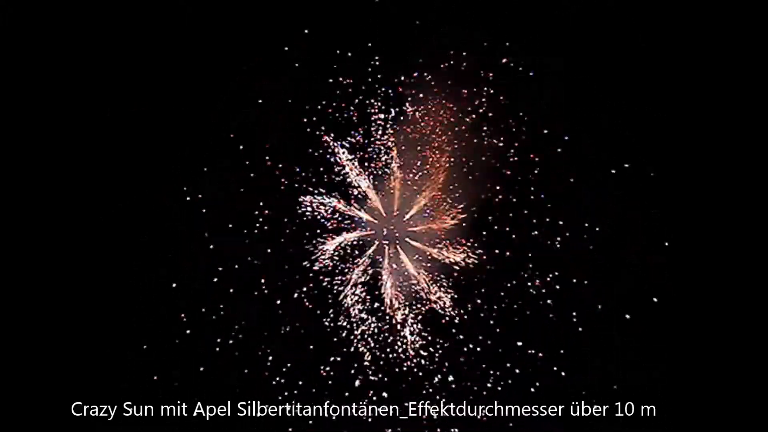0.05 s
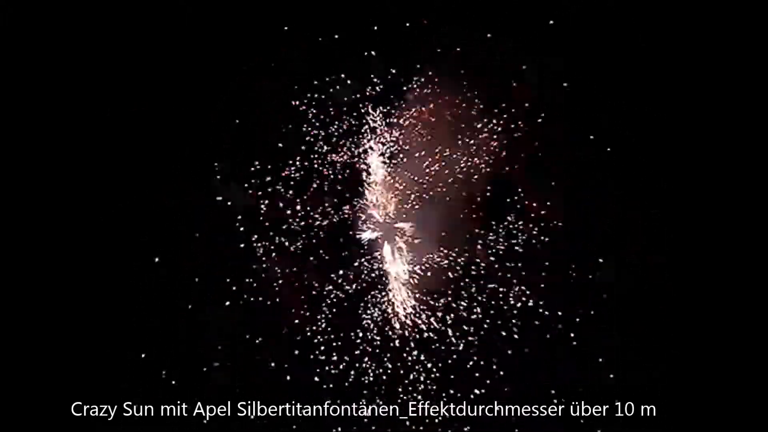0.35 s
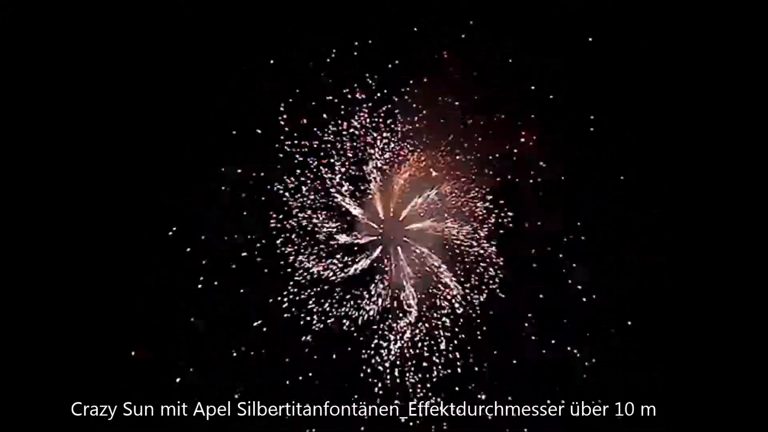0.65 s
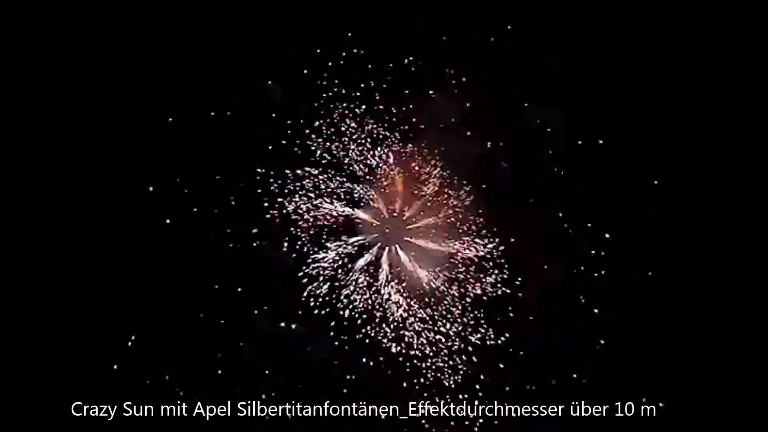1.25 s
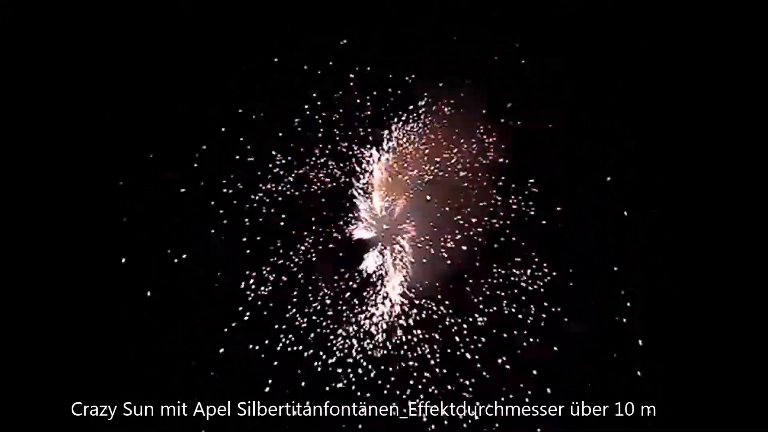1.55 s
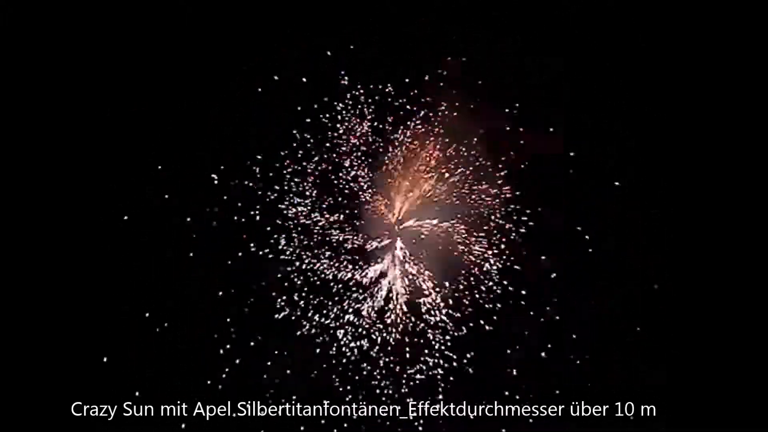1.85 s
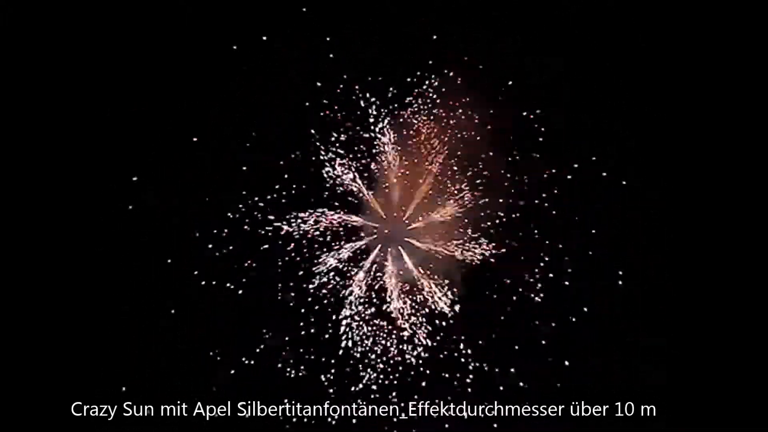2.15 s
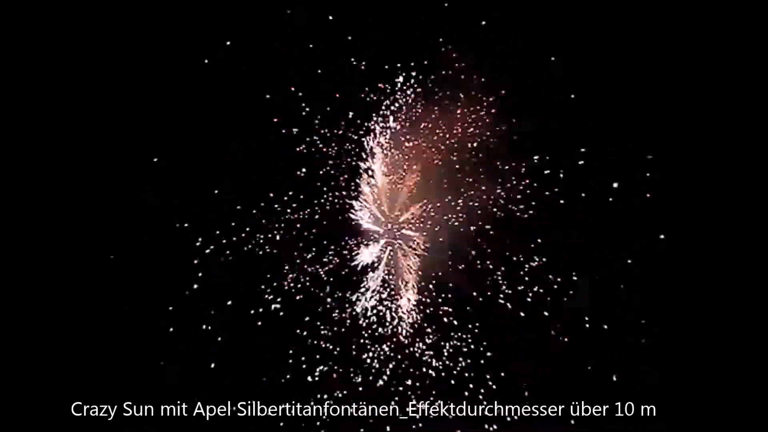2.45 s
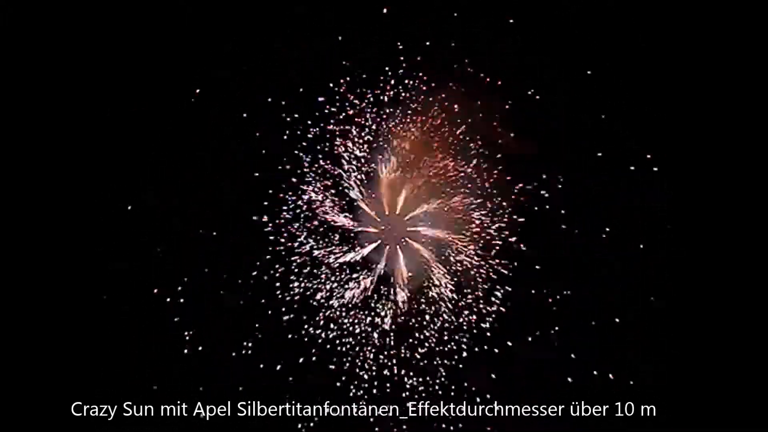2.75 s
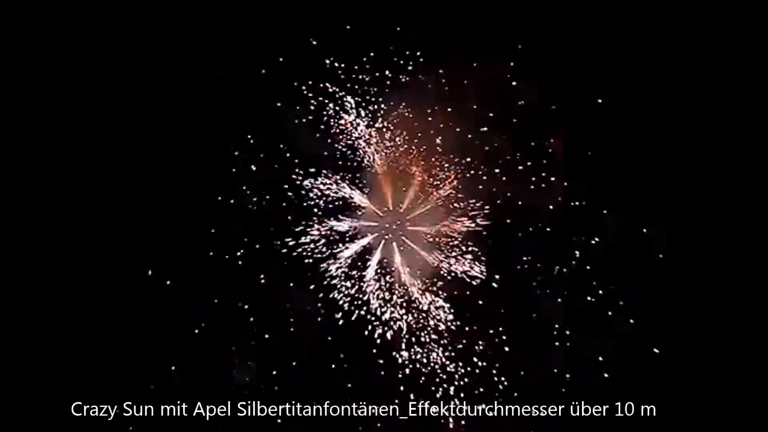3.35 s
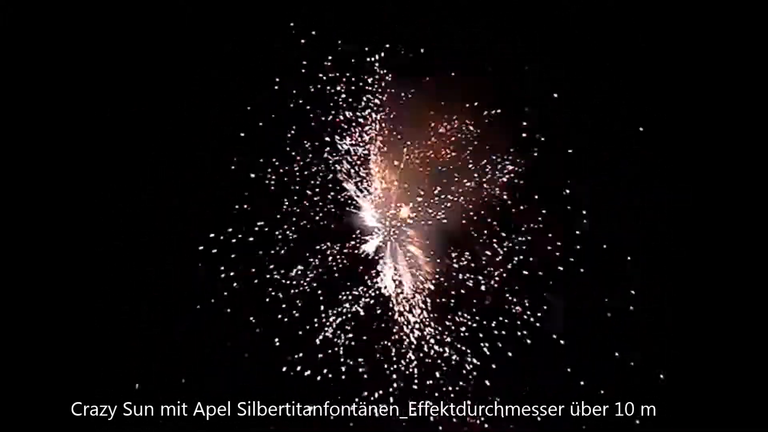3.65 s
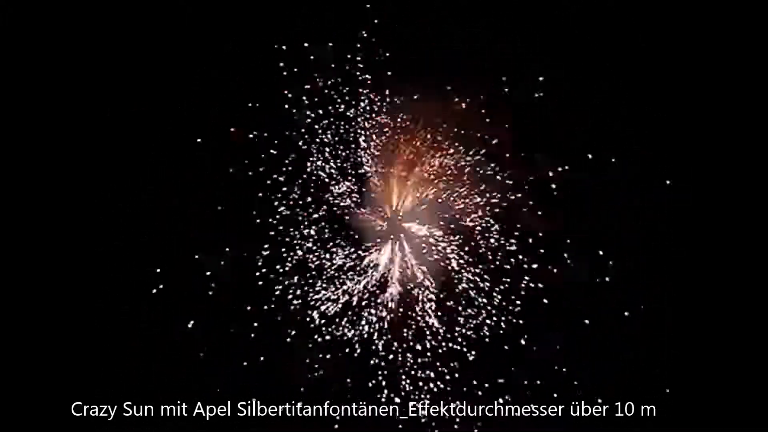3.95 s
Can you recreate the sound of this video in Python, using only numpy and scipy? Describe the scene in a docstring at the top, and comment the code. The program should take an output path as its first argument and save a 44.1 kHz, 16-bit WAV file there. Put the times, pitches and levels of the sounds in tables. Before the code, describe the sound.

A firework wheel spins and burns in the open air, its jets hissing and rushing without a break and fluttering slightly in loudness. A fine sizzle of sparks blends in, with barely audible wind brushing the microphone.

```python
"""A spinning firework wheel

The wheel burns outdoors at night. Gas rushes out of its fountains in churning jets, making a low
roar, a loud rush and a bright hiss. Metal sparks add a fine sizzle of clicks, too many to hear one
by one. Some pitches grow louder or softer on the way to the listener, and light wind rumbles on
the microphone. Both ears hear the same sound."""
import sys
import numpy as np
from scipy.fft import rfft, irfft
from scipy.io import wavfile

SR = 44100
rng = np.random.default_rng(int(sys.argv[2]) if len(sys.argv) > 2 else 0)


def dump_mix(stems):
    """Bounce the given channels to the path in sys.argv[1] as a 16-bit WAV at rate SR."""
    frames = np.atleast_2d(stems).T  # one column per channel
    limited = np.clip(frames, -1, 1)  # hard clip at full scale
    pcm = np.round(limited * 32767).astype(np.int16)
    wavfile.write(sys.argv[1], SR, pcm)


N = 176400
TIME, HZ = np.arange(N) / SR, np.maximum(np.arange(N // 2 + 1) * SR / N, 1)

# How the jets' low roar rises and falls: time_s, change_db
ROAR_SWELLS = [(0.0, -1.5), (0.24, 2.5), (0.28, 0), (0.56, 1.4), (0.6, 0), (1.08, 3.3), (1.16, -1.7),
               (1.84, 2.7), (2.24, 1), (2.28, -2), (2.4, 2.5), (2.68, -0.4), (2.92, 1.5), (3.0, -2.5),
               (3.2, 0.5), (3.28, -2.5), (3.44, 1.5), (3.6, -1.7), (3.64, -0.5), (4.0, -0.5)]
# How the rush in the middle rises and falls: time_s, change_db
RUSH_SWELLS = [(0.0, -0.5), (0.76, 0), (0.84, -2), (0.92, 1.2), (1.24, -1.5), (1.36, 0.7), (1.4, -2),
               (1.52, 1.2), (1.64, -0.9), (1.72, 1.5), (1.96, 0.8), (2.28, -1), (2.4, 1), (2.72, -1.1),
               (2.88, 1), (2.96, -1.4), (3.04, 1), (3.12, -1.4), (3.2, 0), (3.4, -1.6), (3.44, 0),
               (4.0, -0.8)]
# How the high hiss and the sparks rise and fall: time_s, change_db
HISS_SWELLS = [(0.0, 0), (0.68, -0.1), (0.72, -0.6), (0.8, 1.3), (0.92, -1.8), (1.24, 0), (1.28, -1.5),
               (1.4, 0.3), (1.8, -1.3), (1.88, 0.6), (2.0, -2.2), (2.08, 0), (2.16, -1.5), (2.28, 0.2),
               (2.44, -3), (2.52, 0.6), (2.76, -1.1), (2.8, 0.2), (3.28, -1.2), (3.6, 1.1), (3.64, -3),
               (3.8, 0.6), (3.88, -1.9), (4.0, -2)]
# The jets' balance of low and high pitches: pitch_hz, gain_db
JET_TONE = [(60, -45), (160, -32.5), (240, -20.5), (400, -19.5), (560, -9), (1000, -7), (1600, -5),
            (2300, -0.5), (3800, -2), (4900, -2.5), (5500, -5), (7600, -7), (9300, -9.5), (10000, -14.5)]
# The same for a spark: pitch_hz, gain_db
SPARK_TONE = [(200, -41), (900, -15.5), (2500, -3), (5000, 0.5), (10000, -3.5)]
# Peaks and dips in the tone, probably from the ground echo and the tubes: pitch_hz, width_hz, gain_db
PEAKS_AND_DIPS = [(286, 11, 1), (345, 8.3, 1.5), (642, 60, 2), (742, 45, -4.5), (902, 83, 3.5),
                  (1180, 72, -3.5), (1416, 72, 2.5), (1636, 60, -2.5), (1806, 82, 2), (2240, 59, 1),
                  (3110, 140, -1.5), (3680, 110, 1.6), (6310, 120, 0.5), (7800, 100, 2), (8080, 150, -2)]
# The wind's balance of low and high pitches: pitch_hz, gain_db
WIND_TONE = [(10, -5), (25, -1), (60, -3.5), (120, -8.5), (250, -14), (800, -42)]
# Short puffs of wind: peak_s, rise_db
WIND_PUFFS = [(.03, 3.5), (.84, 6), (1.245, 11), (1.43, 9), (2.62, 8), (3.28, 7), (3.56, 7), (3.83, 0.5)]

ROAR_TOP_HZ, RUSH_TOP_HZ, HISS_TOP_HZ = 1606, 5230, 10120
FLUTTER_HZ, SWIRL_HZ, SWIRL_DB = 42, 8.8, .3
SPARKS_PER_S, SPARK_SPREAD_DB, SPARK_DB = 5000, 3.0, -27.5
WIND_DB, WIND_WOBBLE_DB, PUFF_WIDTH_S = -67, 1.5, .018


def jets(colour):
    """Gas streams out of the fountains and churns, making a roar, a rush and a hiss."""
    tone = tone_curve(JET_TONE) * colour
    roar = jet_part(tone, 0, ROAR_TOP_HZ, ROAR_SWELLS, level_db=-33, flutter_db=1)
    rush = jet_part(tone, ROAR_TOP_HZ, RUSH_TOP_HZ, RUSH_SWELLS, level_db=-22.5, flutter_db=.5)
    hiss = jet_part(tone, RUSH_TOP_HZ, HISS_TOP_HZ, HISS_SWELLS, level_db=-27, flutter_db=1)
    return roar + rush + hiss


def jet_part(tone, low_hz, high_hz, swells, level_db, flutter_db):
    """One pitch range of the jet noise. The churning gas makes its loudness flutter quickly."""
    spectrum = rfft(rng.standard_normal(N)) * tone
    edges_hz = np.linspace(low_hz, high_hz, 5)
    noise = np.zeros(N)
    # Four neighbouring bands each swell a little on their own as the jets turn.
    for bottom, top in zip(edges_hz, edges_hz[1:]):
        band = irfft(spectrum * ((HZ >= bottom) & (HZ < top)), N)
        noise += band * from_db(SWIRL_DB * drift(SWIRL_HZ))
    fluttering = unit_level(noise * from_db(flutter_db * drift(FLUTTER_HZ)))
    return fluttering * from_db(level_db + np.interp(TIME, *np.transpose(swells)))


def sparks(colour):
    """Metal grains burst as tiny clicks of uneven size, swelling with the hiss."""
    sizes = from_db(SPARK_SPREAD_DB * np.minimum(rng.exponential(1, N), 5))
    signs = rng.choice([-1, 1], N)
    clicks = sizes * signs * (rng.random(N) < SPARKS_PER_S / SR)
    sizzle = unit_level(irfft(rfft(clicks) * tone_curve(SPARK_TONE) * colour, N))
    return sizzle * from_db(SPARK_DB + np.interp(TIME, *np.transpose(HISS_SWELLS)))


def path_colour():
    """The way from wheel to listener makes some pitches louder and others softer."""
    return from_db(sum(db * bell_curve(HZ, hz, width) for hz, width, db in PEAKS_AND_DIPS))


def wind():
    """Air brushes the microphone: a faint, uneven rumble with a few short puffs."""
    rumble = unit_level(irfft(rfft(rng.standard_normal(N)) * tone_curve(WIND_TONE), N))
    puffs_db = sum(db * bell_curve(TIME, peak_s, PUFF_WIDTH_S) for peak_s, db in WIND_PUFFS)
    return rumble * from_db(WIND_DB + puffs_db + WIND_WOBBLE_DB * drift(rate_hz=8))


def drift(rate_hz):
    """A random wobble of typical size 1, mostly slower than rate_hz."""
    return unit_level(irfft(rfft(rng.standard_normal(N)) / (1 + (HZ / rate_hz) ** 2), N))


def tone_curve(points):
    """Join (pitch_hz, gain_db) points into a multiplier for every pitch."""
    hz, db = np.transpose(points)
    return from_db(np.interp(np.log(HZ), np.log(hz), db))


def bell_curve(x, centre, width):
    """A smooth bump of height 1."""
    return np.exp(-.5 * ((x - centre) / width) ** 2)


def from_db(db):
    """Turn decibels into a multiplier."""
    return 10 ** (np.asarray(db) / 20)


def unit_level(x):
    """Scale a signal so its average strength (rms) is 1."""
    return x / np.sqrt(np.mean(x ** 2) + 1e-20)


def scene():
    """The wheel straight ahead and the wind, the same in both ears."""
    colour = path_colour()
    return np.tile(jets(colour) + sparks(colour) + wind(), (2, 1))


def record(dry):
    """Cut away the highest pitches, above about 10 kHz."""
    treble_cut = np.clip((HISS_TOP_HZ + 80 - HZ) / 250, 0, 1) ** 2
    return irfft(rfft(dry) * treble_cut, N)


dry = scene()
out = record(dry)
dump_mix(out)
```